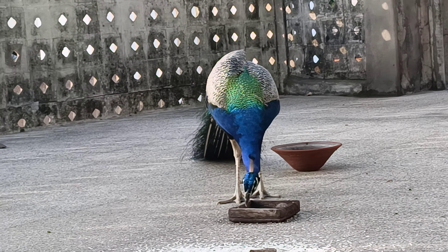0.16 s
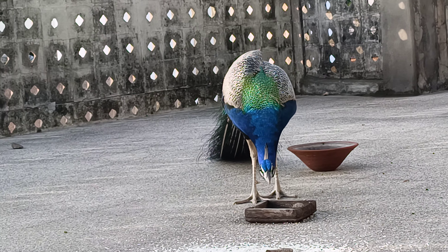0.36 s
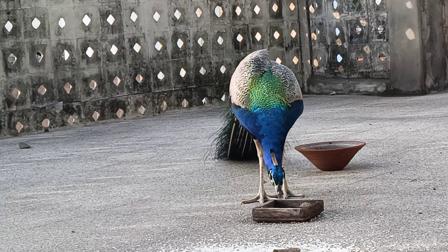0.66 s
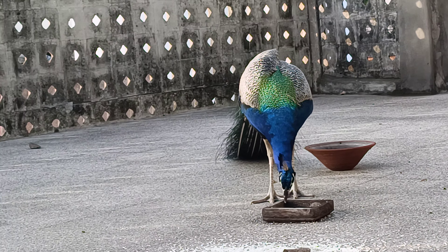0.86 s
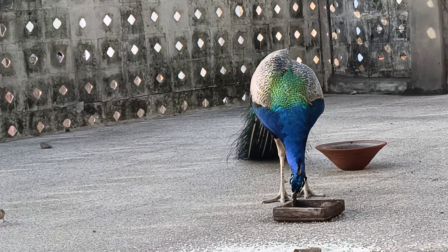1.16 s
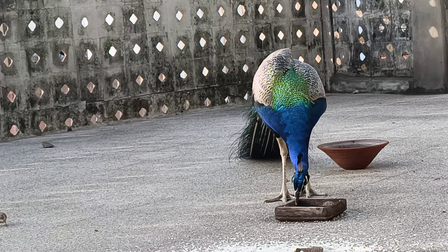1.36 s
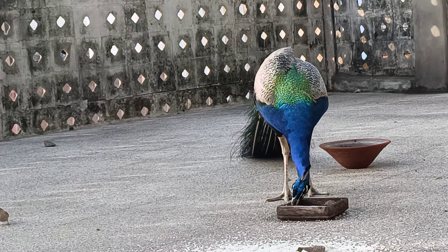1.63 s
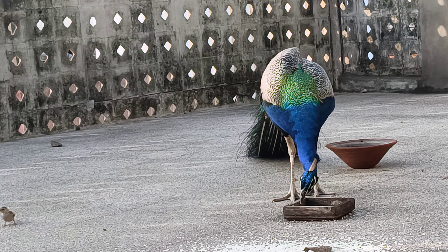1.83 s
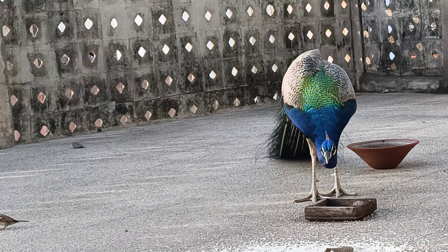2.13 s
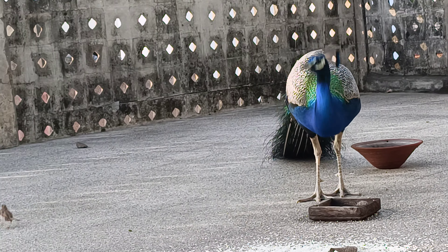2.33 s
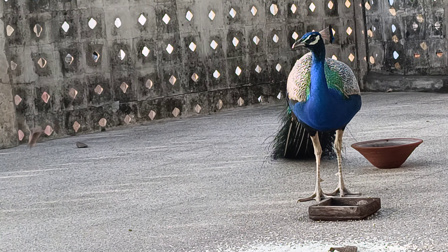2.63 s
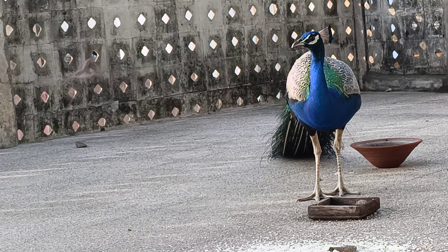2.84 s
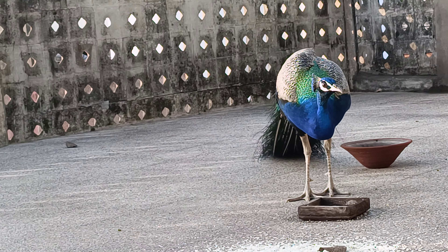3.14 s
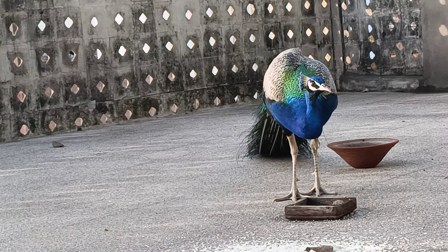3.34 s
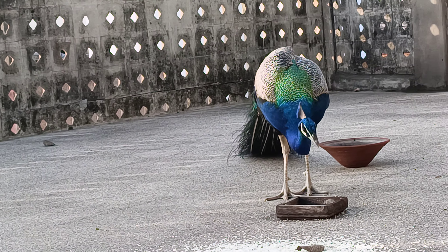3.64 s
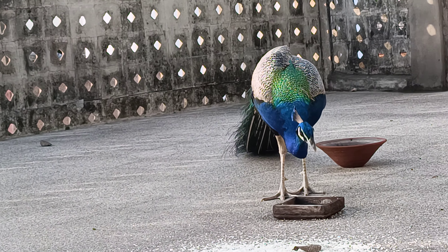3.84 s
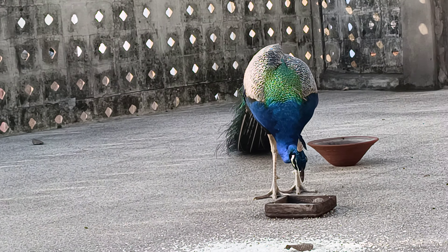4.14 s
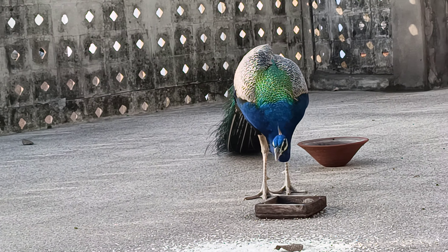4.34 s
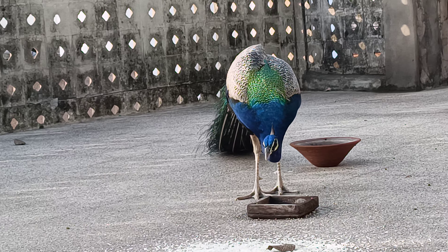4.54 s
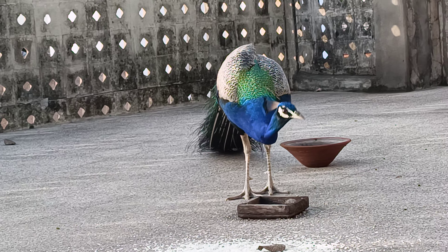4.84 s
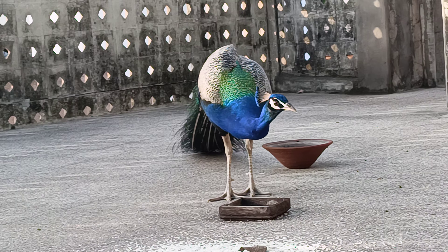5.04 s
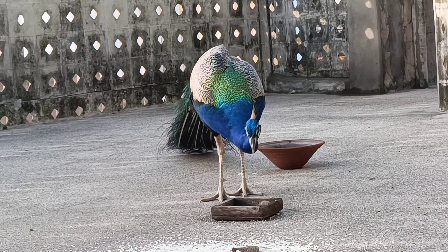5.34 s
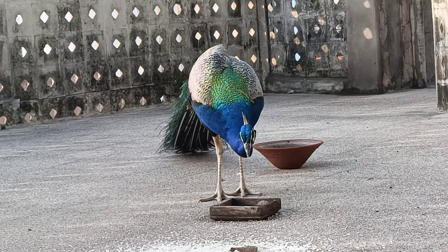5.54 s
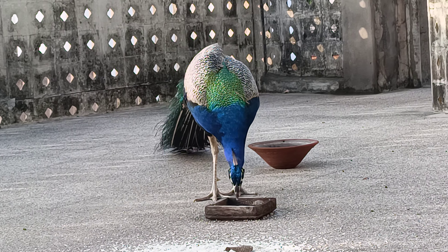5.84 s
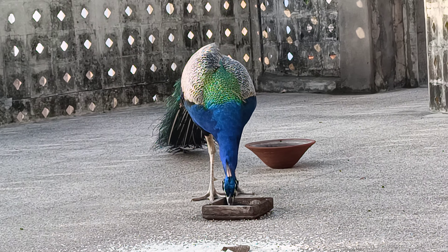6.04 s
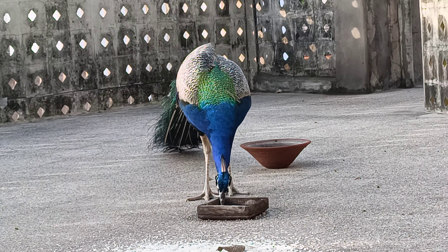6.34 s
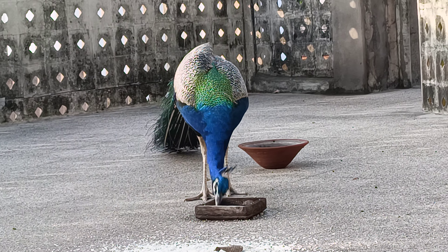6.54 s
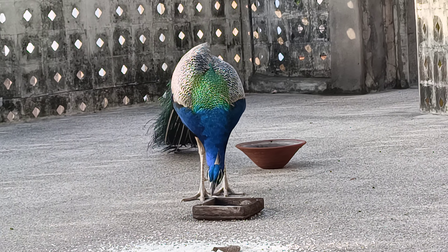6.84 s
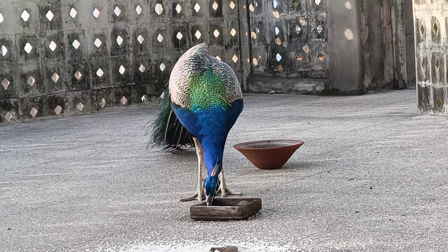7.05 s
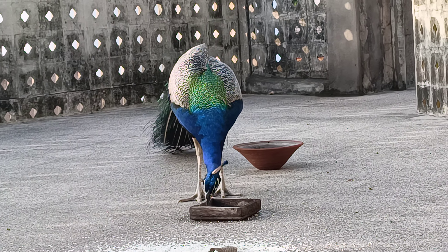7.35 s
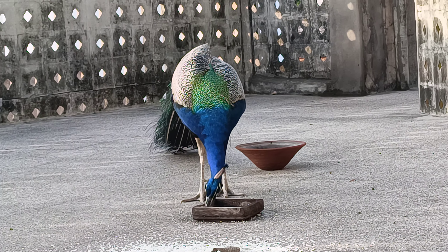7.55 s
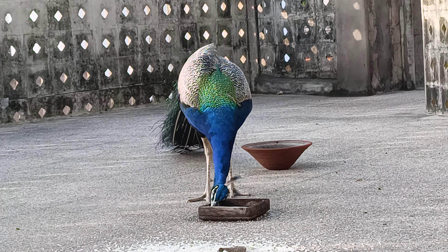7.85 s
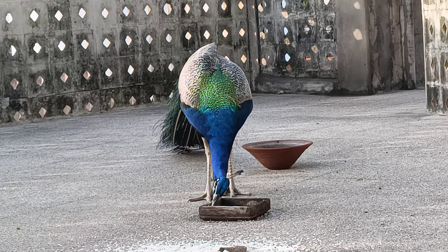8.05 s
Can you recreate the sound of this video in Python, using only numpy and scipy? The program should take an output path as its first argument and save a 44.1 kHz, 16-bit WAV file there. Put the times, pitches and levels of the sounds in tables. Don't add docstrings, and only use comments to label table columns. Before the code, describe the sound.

Dry beak pecks on wood and sparse bird chirps over a constant low hum, with traffic drawing near from the street halfway through.

```python
import sys
import numpy as np
from scipy import signal
from scipy.fft import rfft, irfft
from scipy.io import wavfile
from scipy.ndimage import uniform_filter1d

SR = 44100
rng = np.random.default_rng(int(sys.argv[2]) if len(sys.argv) > 2 else 0)


def convert_level_to_amplitude(level_db):
    exponent = np.asarray(level_db, float) / 20
    return 10 ** exponent


def wav_record(signal):
    frames = np.transpose(np.atleast_2d(signal))
    bounded = np.clip(frames, -1, 1)
    quanta = np.round(bounded * 32767).astype(np.int16)
    wavfile.write(sys.argv[1], SR, quanta)


N = 361179
T = np.arange(N) / SR
HZ = np.maximum(np.fft.rfftfreq(N, 1 / SR), 1)
SIDES = np.array([[.5], [-.5]])
TOP_HZ = 15780

# time in seconds, low ring in dB, high ring in dB, husk crack in dB,
# left minus right in dB.
PECKS = [
    (0.174, -47, -47.5, -57.5, 1.5),
    (0.377, -50.5, -49, -71, 0),
    (1.12, -48, -49, -63.5, 3),
    (1.363, -50.5, -47, -61, 4.5),
    (1.756, -48, -39.5, -65, 2),
    (6.175, -47, -55, -64, 3),
    (6.374, -49, -48.5, -69, 3),
    (7.204, -56, -52, -72, 7),
    (7.411, -56, -47, -67, 10),
]
# pitch in Hz, level in dB, time to fade by 60 dB in seconds.
TRAY_LOW = [(790, -1, .022), (1160, -1, .02), (1380, -4, .016)]
TRAY_HIGH = [(2200, 0, .016), (2650, -1, .013), (3400, -13, .008)]
BEAK_CLICK = [(1750, 0, .005)]
# start in seconds, delay to the top in seconds, length in seconds,
# top pitch in Hz, level in dB.
NEAR_WHISTLES = [
    (2.004, .04, .08, 4610, -27),
    (2.11, .056, .075, 4770, -28.5),
]
# start in seconds, length in seconds,
# starting pitch in Hz, level in dB.
CHEEPS = [(0.0, 0.028, 4200, -55.5), (.715, 0.071, 6200, -61.5), (.73, 0.085, 4630, -63),
          (1.055, .066, 6380, -63), (1.0, .05, 4650, -63), (1.685, .05, 6660, -68),
          (1.745, 0.039, 6230, -61), (1.76, 0.095, 4610, -65), (5.62, 0.07, 6000, -64),
          (5.65, .08, 4430, -68), (7.1, 0.088, 6450, -64.5), (7.159, 0.05, 4400, -64)]
SWOOPS = [(1.15, 0.069, 4890, -50), (3.025, .045, 4520, -53), (3.079, .035, 3970, -51.5)]
RISERS = [(1.58, .074, 4150, -68), (2.479, 0.053, 3930, -65.5), (2.65, 0.09, 4800, -76),
          (3.73, 0.047, 4240, -62)]
WHIPS = [(3.005, 0.023, 4840, -51.5), (6.555, 0.057, 3244, -57.5)]
PEEPS = [(.19, 0.13, 9630, -76), (2.335, 0.056, 1522, -62.5), (2.64, .07, 3240, -68),
         (4.06, 0.089, 3700, -70), (4.08, .05, 3170, -67), (5.13, .17, 1425, -54.5),
         (5.21, 0.089, 3780, -63.5)]
PIPS = [(1.005, 0.028, 2040, -63), (1.121, 0.024, 5250, -48.5), (3.77, 0.024, 2160, -62),
        (4.02, .044, 2300, -59), (4.259, .042, 2407, -60.5), (4.5, 0.037, 2414, -58),
        (4.728, 0.03, 2440, -53)]
HARSH_CALLS = [(.554, 0.034, 4490, -59)]
# start in seconds, top pitch in Hz, level in dB.
CALLER = [(2.36, 1407, -67), (2.6, 1500, -66), (2.9, 1545, -63.5), (3.18, 1611, -62.5), (3.48, 1650, -63.5),
          (3.76, 1663, -64), (4.041, 1618, -63.5)]
# pitch in Hz, level in dB against the main tone.
NEAR_THROAT = [(4000, -4), (6000, -6.5), (8500, -30), (14000, -33)]
FAR_THROAT = [(3200, -34), (7000, -20), (12000, -30)]
HARSH_THROAT = [(8000, -18), (11000, 5), (15000, -3)]
# start in seconds, length in seconds, centre in Hz, width
# in octaves, level in dB.
RUSTLES = [(0.107, 0.86, 6000, 0.4, -77), (0.56, 0.16, 10000, 0.7, -60.5), (1.05, 0.38, 4760, 0.29, -59.5),
           (1.694, 0.25, 4730, 0.3, -62.5), (2.004, 0.098, 8000, 0.26, -52),
           (2.136, 0.06, 7700, 0.32, -51.5), (2.598, 0.79, 12400, 1, -71.5),
           (2.984, 0.039, 5500, 0.22, -61), (4.794, 0.71, 3090, 0.28, -60.5),
           (6.152, 0.029, 14000, .2, -63), (6.287, 0.6, 8000, 0.47, -71)]
# time in seconds, cycle rate in Hz, level in dB.
ENGINE_A = [(3.8, 21.1, -47.5), (4.25, 20.3, -40.5), (4.75, 23, -40.5), (5.1, 21.4, -39),
            (5.5, 20.8, -42.5), (5.85, 21, -36.5), (6.3, 20.8, -46), (6.7, 20.5, -46)]
ENGINE_B = [(5.3, 19.2, -45.5), (5.75, 17.4, -54), (6.3, 18.5, -45), (6.8, 18, -50), (6.95, 17.5, -45.5),
            (7.15, 18.2, -61), (7.6, 19.3, -44), (8.19, 19.9, -44.5)]
# multiple of the cycle rate, level in dB.
ORDERS_A = [(2, -31.5), (5, -18), (6, -8.5), (8, 1), (10, -13)]
ORDERS_B = [(2, -24.5), (4, -7), (5, 0), (6, -0.5), (7, -2), (8, -1), (9, 2), (10, -1.5), (11, -18.5),
            (12, -7.5)]
# time in seconds, rate of meeting teeth in Hz, level in dB.
WHINE = [(4.1, 705, -79), (4.4, 704, -64), (4.8, 772.6, -64), (5.3, 690, -59), (5.901, 665, -62),
         (6.3, 660, -70), (6.901, 670.4, -66), (7.5, 705.4, -60.5), (8.19, 720.8, -59)]
# multiple of the tooth rate, level in dB.
WHINE_ORDERS = [(1, -1.5), (2, 3), (3, 4.5)]
# time in seconds, level in dB.
HUM = [(0, -37), (.7, -36), (1.1, -34.5), (1.4, -36), (2.6, -36.5), (2.9, -37.5), (3.3, -35), (3.55, -37.5),
       (3.75, -35), (4.3, -43.5), (5, -35.5), (6, -35.5), (6.9, -37.5), (7.3, -30), (7.7, -37), (8.19, -36)]
# time in seconds, pitch in Hz, level in dB.
FAN = [(0, 334.5, -64), (3.2, 334, -62), (5, 334.5, -59), (8.19, 336.5, -56)]
# multiple of its pitch, level in dB.
FAN_ORDERS = [(1, 0)]
# pitch in Hz, level in dB per Hz.
STREET = [(25, -23.5), (60, -6.5), (110, 0.5), (200, -4), (500, -18.5), (850, -17), (1050, -24.5),
          (2500, -24.5), (5000, -33.5), (8000, -40.5), (15500, -46)]
TOWN = [(25, -31), (60, -4.5), (110, -1), (180, 1), (260, -9.5), (500, -18), (850, -23), (1050, -30),
        (2000, -33.5), (5000, -37.5), (7000, -50), (10000, -53.5), (15500, -47)]
# pitch in Hz, left-right correlation from -1 to 1.
LIKENESS = [(60, 0.95), (130, 1), (290, 0.77), (640, -0.037), (1410, -0.35), (3100, 0.021), (6820, 0.025),
            (15000, -0.14)]
# pitch in Hz, left minus right in dB.
PORTS = [(60, -2), (110, 0.5), (200, -2), (380, 2), (700, 2), (1290, 2.5), (2380, 3.5), (4400, -3),
         (8120, 0.5), (15000, -6)]


def pecks():
    out = np.zeros((2, N))
    t = np.arange(SR // 10) / SR
    for s, low_db, high_db, husk_db, pan_db in PECKS:
        blow = convert_level_to_amplitude(low_db + 5.5) * ring(TRAY_LOW, t)
        blow = blow + convert_level_to_amplitude(high_db + 6.5) * ring(TRAY_HIGH, t)
        blow = blow + convert_level_to_amplitude(low_db + 7.0) * ring(BEAK_CLICK, t)
        husk = convert_level_to_amplitude(husk_db - 60 * t / 0.095) * np.diff(rng.standard_normal(len(t) + 1))
        add(out, s - .005, convert_level_to_amplitude(-7.5) * blow, pan_db, lag=3)
        add(out, s + .0006, blow, pan_db, lag=3)
        add(out, s + 0.003256, convert_level_to_amplitude(-4.5) * blow, pan_db, lag=3)
        add(out, s + 0.01, husk, pan_db, lag=3)
        add(out, s + .0155, convert_level_to_amplitude(-15.5) * blow, -pan_db, lag=3)
    return out + convert_level_to_amplitude(-5.0) * walls(out, t60=0.35, gap_s=0.0025, damp_hz=8000)


def ring(modes, t):
    push = np.clip(t / 0.00034, 0, 1)
    total = 0
    for k, (hz, db, t60) in enumerate(modes):
        detuned_hz = hz * (1 + 0.022 * rng.standard_normal())
        fade = convert_level_to_amplitude(db - 60 * t / t60)
        total = total + (-1) ** k * fade * np.sin(2 * np.pi * detuned_hz * t)
    return push * total


def near_bird():
    foot_hz, creep_hz_per_s, climb_s, sag_hz_per_s = 2068, 6980, .0145, 11200
    foot_db, fade_db_per_s, attack_s, release_s = -14.5, 300, 0.017, 0.02
    wall_echo_s = .021
    out = np.zeros((2, N))
    for s, top_s, length, top_hz, db in NEAR_WHISTLES:
        t = np.arange(int(length * SR)) / SR
        effort = np.exp(-(np.maximum(top_s - t, 0) / climb_s) ** 2)
        after = np.maximum(t - top_s, 0)
        low_hz = foot_hz + creep_hz_per_s * t
        hz = (1 - effort) * low_hz + effort * top_hz - sag_hz_per_s * after
        edges = np.clip(t / attack_s, 0, 1) * np.clip((length - t) / release_s, 0, 1)
        gain = edges ** 2 * convert_level_to_amplitude(db + foot_db * (1 - effort) - fade_db_per_s * after)
        add(out, s, whistle(hz, gain, NEAR_THROAT, rasp=0.02, grate_db=1.5), pan_db=1.0, lag=4)
    out = out + convert_level_to_amplitude(-16) * np.roll(out[::-1], int(wall_echo_s * SR), axis=1)
    return out + convert_level_to_amplitude(-0.5) * walls(out, t60=0.41, gap_s=0.0048, damp_hz=9000)


def whistle(hz, gain, throat, rasp, grate_db):
    shake = uniform_filter1d(rng.standard_normal((2, len(hz))), size=50) * np.sqrt(50)
    phase = 2 * np.pi * np.cumsum(hz * (1 + rasp * shake[0])) / SR
    throat_hz, throat_db = np.transpose(throat)
    voice = np.sin(phase)
    for k in range(2, 7):
        colour = convert_level_to_amplitude(np.interp(k * hz, throat_hz, throat_db))
        voice = voice + colour * np.sin(k * phase) * (k * hz < TOP_HZ)
    return np.sqrt(2) * gain * convert_level_to_amplitude(grate_db * shake[1]) * voice


def far_birds():
    out = calls(CHEEPS, -8500, 0.044, FAR_THROAT)
    out = out + calls(SWOOPS, -30000, 0.032, FAR_THROAT)
    out = out + calls(RISERS, 9930, 0.065, FAR_THROAT)
    out = out + calls(WHIPS, 25400, 0.059, FAR_THROAT)
    out = out + calls(PEEPS, -350, 0.01, FAR_THROAT)
    out = out + calls(PIPS, -2500, 0.02, FAR_THROAT)
    out = out + calls(HARSH_CALLS, 28000, 0.055, HARSH_THROAT)
    out = out + distant_caller()
    return convert_level_to_amplitude(-3.5) * out + walls(out, t60=0.61, gap_s=0.0011, damp_hz=11900)


def calls(rows, slide_hz_per_s, rasp, throat):
    out = np.zeros((2, N))
    for s, length, from_hz, db in rows:
        t = np.arange(int(length * SR)) / SR
        hz = from_hz + slide_hz_per_s * t
        gain = convert_level_to_amplitude(db) * np.sin(np.pi * (t / length) ** 0.6) ** 0.33
        add(out, s, whistle(hz, gain, throat, rasp, grate_db=88 * rasp), pan_db=-3.5, lag=5)
    return out


def distant_caller():
    note_s, foot = .16, .8
    out = np.zeros((2, N))
    u = np.arange(int(note_s * SR)) / (note_s * SR)
    for s, top_hz, db in CALLER:
        arch = top_hz * (foot + (1 - foot) * np.sin(np.pi * u ** 1.4) ** 2)
        gain = convert_level_to_amplitude(db) * np.sin(np.pi * u) ** 0.33
        add(out, s, whistle(arch, gain, [(3000, -37)], rasp=0.013, grate_db=5.5), pan_db=0.5, lag=15)
    return out


def rustles():
    out = np.zeros((2, N))
    for s, length, hz, octaves, db in RUSTLES:
        u = np.arange(int(length * SR)) / (length * SR)
        bins = np.maximum(np.fft.rfftfreq(len(u), 1 / SR), 1)
        band = np.exp(-.5 * (np.log2(bins / hz) / octaves) ** 2)
        hiss = irfft(rfft(rng.standard_normal(len(u))) * band, len(u))
        add(out, s, convert_level_to_amplitude(db) * unit(hiss) * np.sin(np.pi * np.sqrt(u)), pan_db=-2.5, lag=5)
    return convert_level_to_amplitude(-14) * out + walls(out, t60=0.32, gap_s=0.0018, damp_hz=14000)


def engines():
    first = tone(ENGINE_A, ORDERS_A, wobble=0.005, flutter_db=1.0, rate=4.6, lead=0.57)
    second = tone(ENGINE_B, ORDERS_B, wobble=0.00422, flutter_db=2.5, rate=4, lead=0.56)
    return first + second


def gears():
    s, hz, db = np.transpose(WHINE)
    phase = 2 * np.pi * np.cumsum(np.interp(T, s, hz)) / SR
    out = 0
    for k, order_db in WHINE_ORDERS:
        low_pass = signal.butter(2, 37.0 * k, fs=SR, output="sos")
        a, b = signal.sosfilt(low_pass, rng.standard_normal((2, 2, N)))
        band = unit(a * np.cos(k * phase) + b * np.sin(k * phase))
        out = out + convert_level_to_amplitude(order_db + 0.27 * walk(4.05)) * band
    return out * convert_level_to_amplitude(np.interp(T, s, db, left=-200))


def street():
    far_db, near_db, corner_s, corner_takes_s = -60, -43.5, 4.08, 0.16
    level_db = far_db + (near_db - far_db) * step(T - corner_s, corner_takes_s)
    level_db = level_db + 0.4 * (T - 6.5)
    return convert_level_to_amplitude(level_db) * rumble(STREET, swell_db=0.65, flicker_db=0.3)


def hum():
    table = [(s, 150, db) for s, db in HUM]
    return tone(table, [(1, -0.5), (2, -39)], wobble=0.0019, flutter_db=0.18, rate=6, lead=0.49)


def fan():
    return tone(FAN, FAN_ORDERS, wobble=0.0032, flutter_db=-0.5, rate=5, lead=1.0)


def town():
    return convert_level_to_amplitude(-43) * rumble(TOWN, swell_db=1.02, flicker_db=0.67)


def rumble(spectrum, swell_db, flicker_db):
    like = np.clip(on_log(LIKENESS), -.99, .99)
    mid, side = rfft(rng.standard_normal((2, N)))
    pair = np.sqrt(1 + like) * mid + 2 * SIDES * np.sqrt(1 - like) * side
    pair = pair * convert_level_to_amplitude(on_log(spectrum) + SIDES * on_log(PORTS))
    out = 0
    for octave in range(4, 15):
        band = np.cos(np.pi / 2 * np.clip(np.log2(HZ) - octave, -1, 1)) ** 2
        level_db = swell_db * walk(0.63) + flicker_db * walk(6.5)
        out = out + convert_level_to_amplitude(level_db) * irfft(pair * band, N)
    return unit(out)


def tone(table, orders, wobble, flutter_db, rate, lead):
    s, hz, db = np.transpose(table)
    phase = 2 * np.pi * np.cumsum(np.interp(T, s, hz) * (1 + wobble * walk(rate))) / SR
    partials = 0
    for k, order_db in orders:
        level = convert_level_to_amplitude(order_db + flutter_db * walk(rate))
        partials = partials + level * np.sin(k * phase + k * k + lead * SIDES)
    return np.sqrt(2) * convert_level_to_amplitude(np.interp(T, s, db, left=-200, right=-200)) * partials


def walls(x, t60, gap_s, damp_hz):
    t = np.arange(SR) / SR
    tail = rng.standard_normal((2, SR)) * convert_level_to_amplitude(-60 * t / t60) * np.clip(t / gap_s, 0, 1) ** 2
    tail = signal.lfilter([1], [1, -np.exp(-2 * np.pi * damp_hz / SR)], tail)
    tail = tail / np.sqrt(np.sum(tail ** 2, axis=1, keepdims=True))
    return signal.fftconvolve(x, tail, axes=1)[:, :N]


def add(out, s, sound, pan_db, lag):
    for side in range(2):
        i = int(s * SR) + side * lag
        out[side, i:i + len(sound)] += convert_level_to_amplitude(pan_db * SIDES[side]) * sound[:N - i]


def walk(rate):
    k = int(SR / rate)
    held = np.repeat(rng.standard_normal(N // k + 1), k)
    return unit(uniform_filter1d(uniform_filter1d(held, k), k)[:N])


def step(t, width_s):
    return .5 + .5 * np.tanh(t / (2 * width_s))


def on_log(table):
    hz, value = np.transpose(table)
    return np.interp(np.log(HZ), np.log(hz), value)


def unit(x):
    return x / np.sqrt(np.mean(x ** 2))


def scene():
    birds = pecks() + near_bird() + far_birds() + rustles()
    machines = (engines() + hum() + fan()) * convert_level_to_amplitude(1.4 * SIDES)
    return birds + machines + gears() + street() + town()


def band_limit(x):
    return signal.sosfilt(signal.butter(12, 15960, fs=SR, output="sos"), x)


def record(dry):
    low_pass = signal.ellip(10, .2, 70, TOP_HZ, fs=SR, output="sos")
    mix = signal.sosfilt(low_pass, dry)
    return band_limit(mix)


dry = scene()
out = record(dry)
wav_record(out)
```